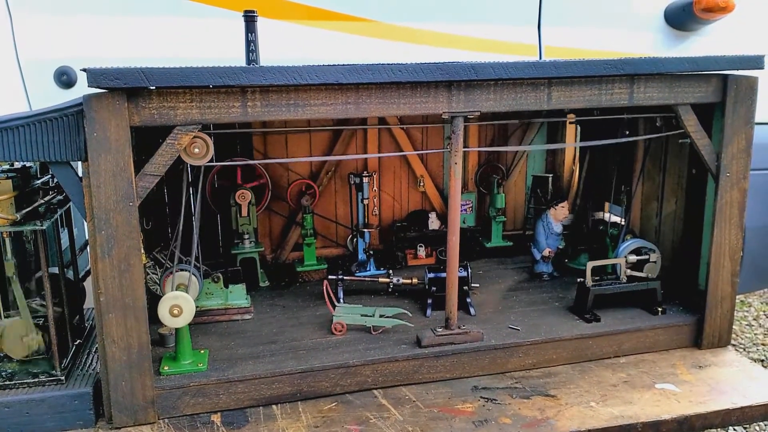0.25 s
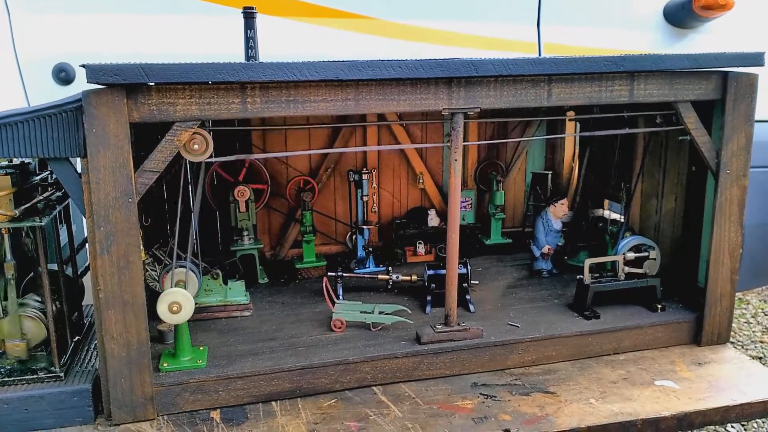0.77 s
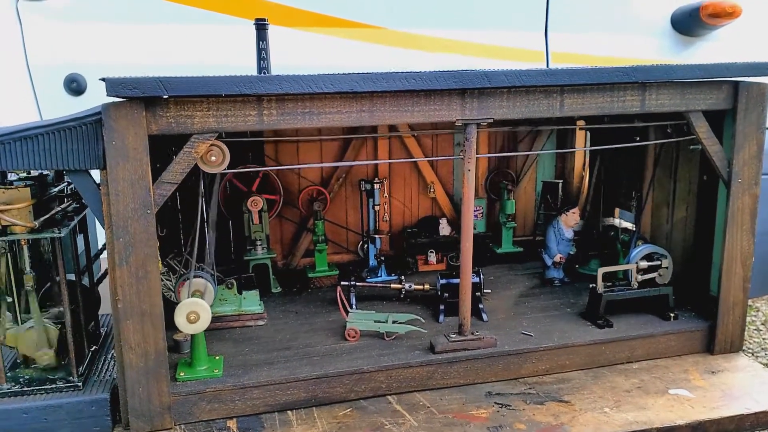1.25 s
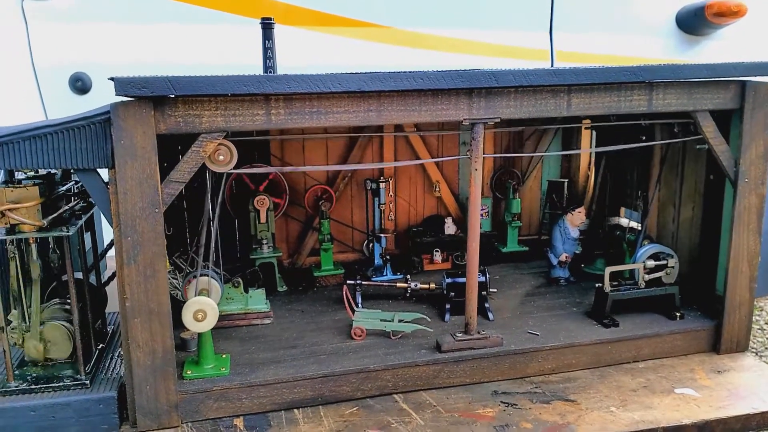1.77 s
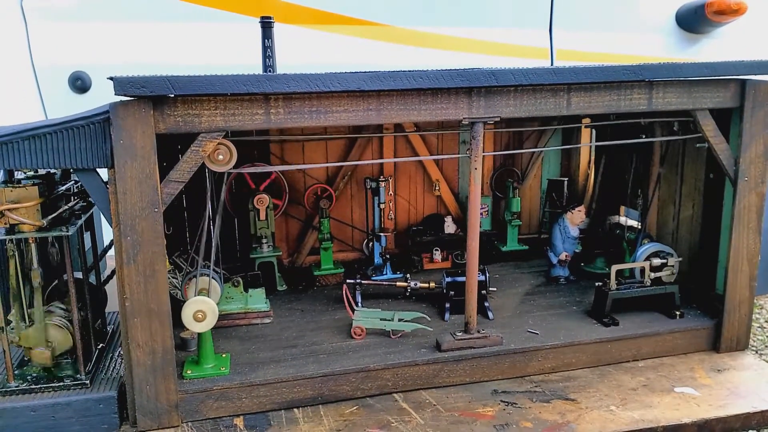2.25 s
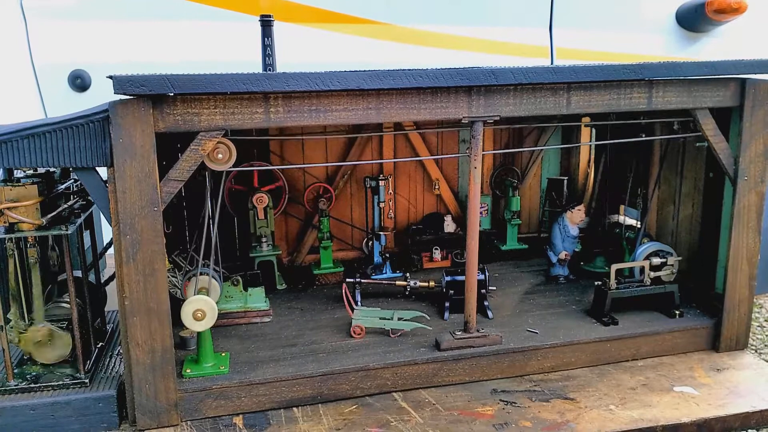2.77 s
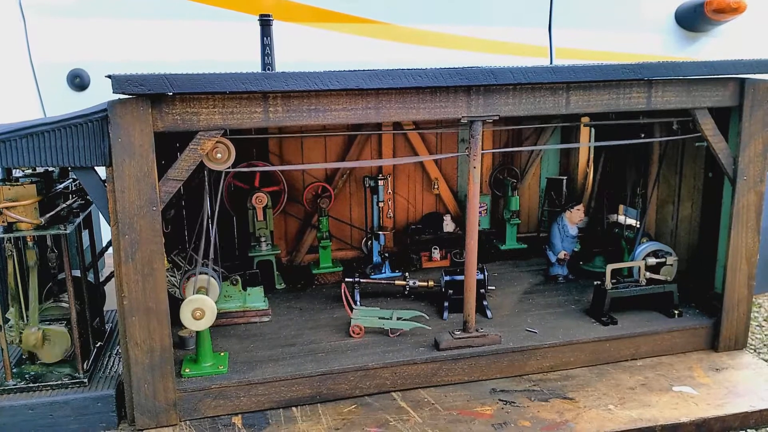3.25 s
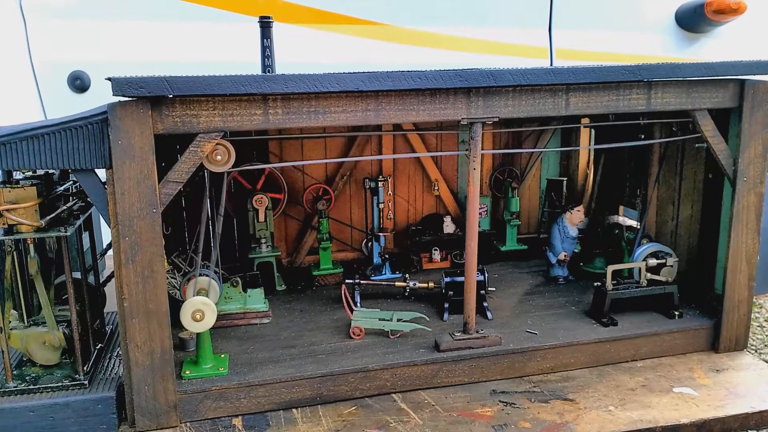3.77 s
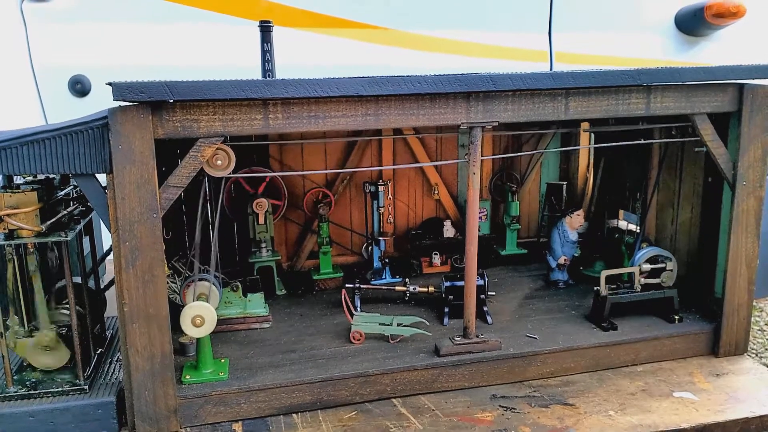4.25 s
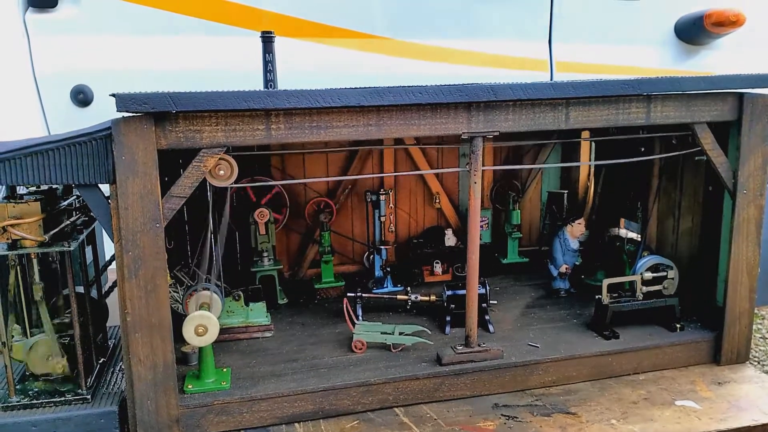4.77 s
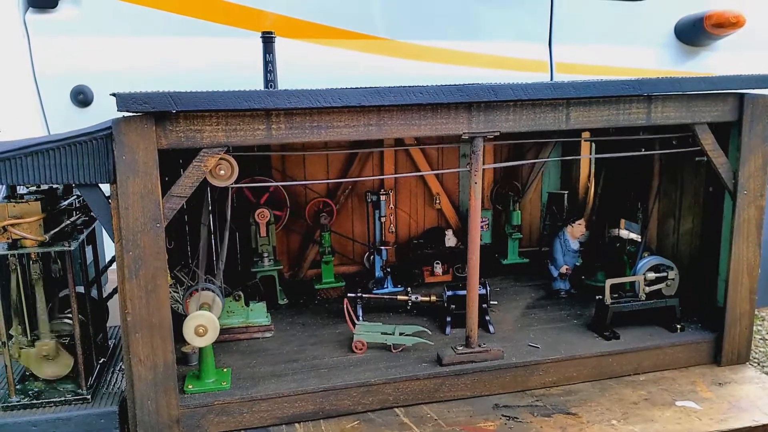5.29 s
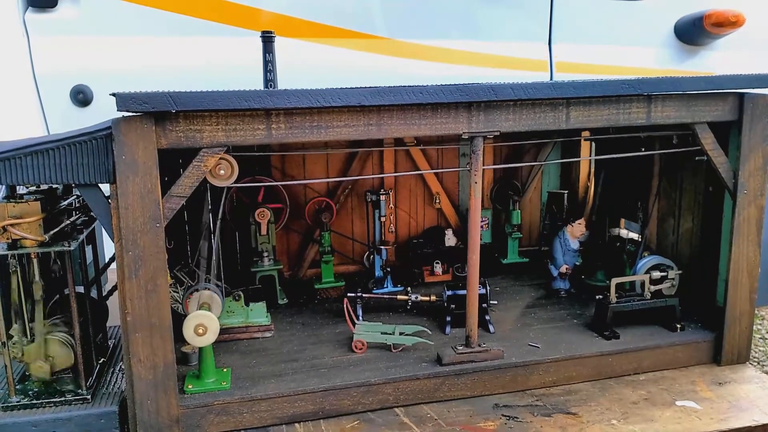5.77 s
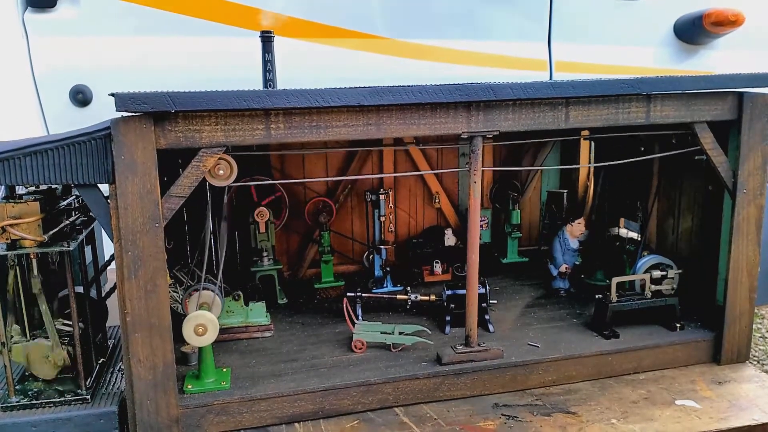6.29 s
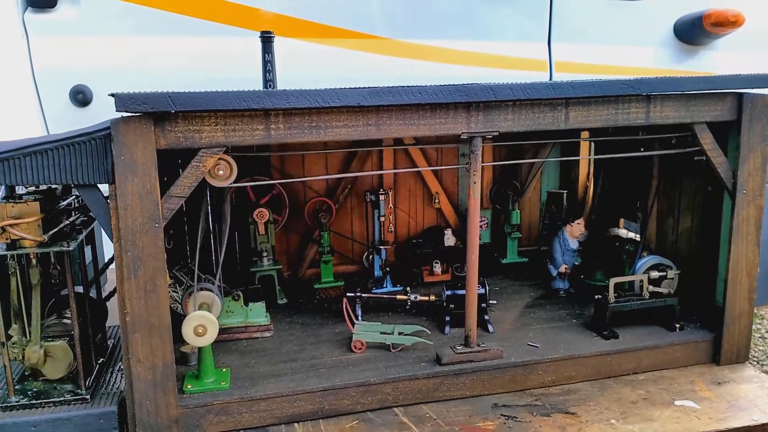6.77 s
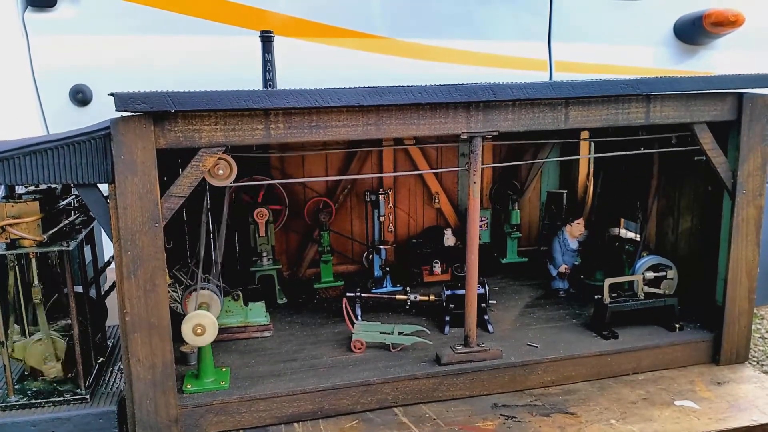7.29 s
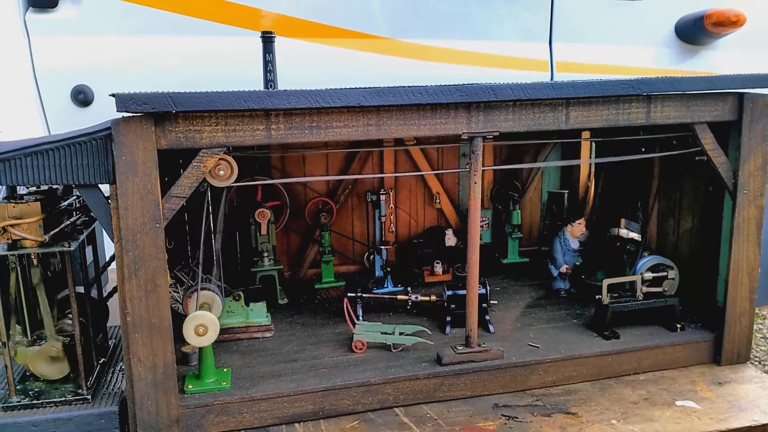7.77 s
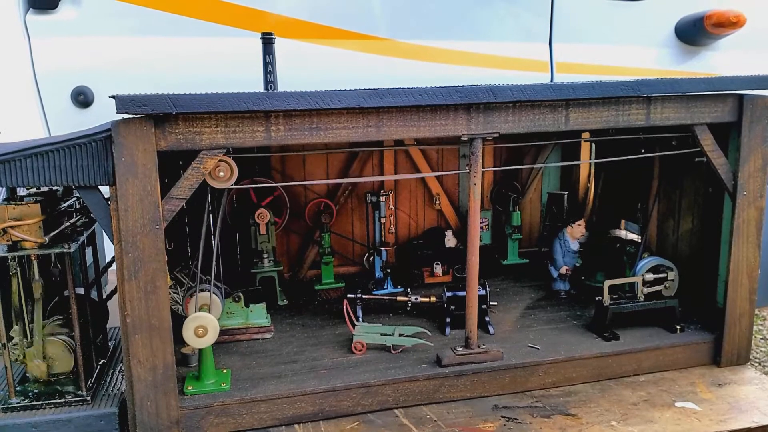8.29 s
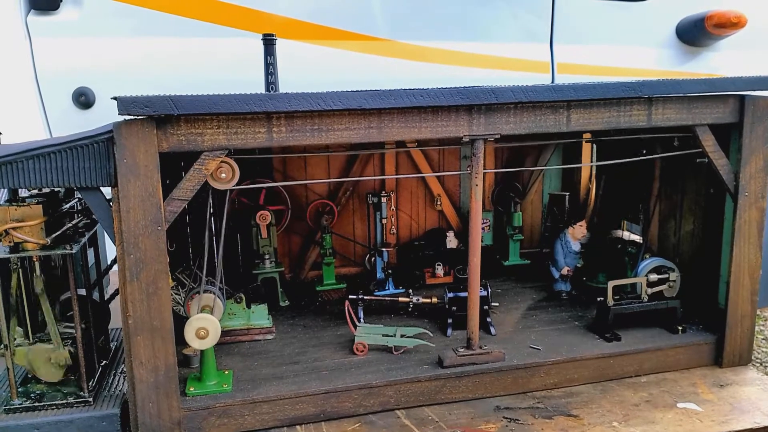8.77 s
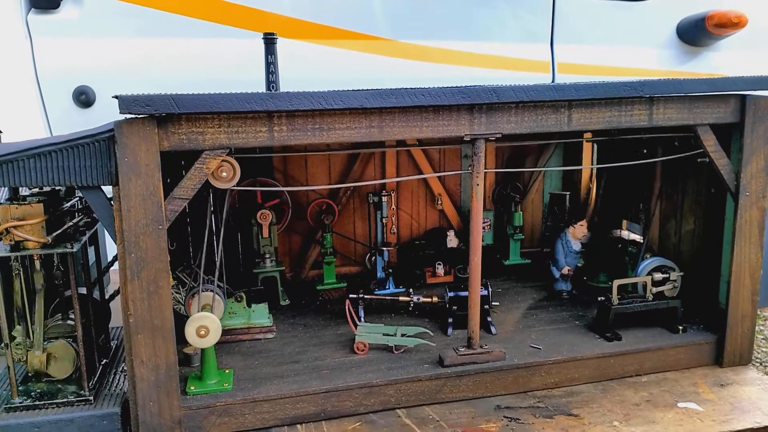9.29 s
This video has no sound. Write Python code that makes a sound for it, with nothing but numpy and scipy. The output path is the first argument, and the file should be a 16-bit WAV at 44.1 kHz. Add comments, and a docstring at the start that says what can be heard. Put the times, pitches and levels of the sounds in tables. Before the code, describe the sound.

Miniature workshop machinery runs nonstop, a slow crank knocking three times a second above rapid linkage chatter, crisp ticks and pattering belts.

```python
"""Small wooden workshop: two model steam engines drive belts and miniature machines.
The slow engine knocks about three times a second as its crank strikes and rebounds; noise puffs on both strokes.
The fast one turns about nine times a second: a catch ticks sharply on some turns, and a repeated run of
blows rattles loose linkage, clacks in the frame and thumps in the baseboard. Around them belts and pulleys
patter, scrape and squeak, a faint high hiss comes in bursts, and the close walls hollow out narrow bands."""
import sys
import numpy as np
from scipy import signal
from scipy.fft import rfft, irfft
from scipy.io import wavfile

SR = 44100
rng = np.random.default_rng(int(sys.argv[2]) if len(sys.argv) > 2 else 0)


def wav_out(sig):
    """Save sig, one row per channel (or a flat mono array), as 16-bit PCM at SR to the path in sys.argv[1]."""
    wavfile.write(sys.argv[1], SR, np.round(np.clip(np.atleast_2d(sig).T, -1, 1) * 32767).astype(np.int16))


N = 420713

# body resonances: f/Hz, half-width/Hz, relative level/dB
BOARD_MODES = [(165.1, 12.7, -1.5), (215.3, 14.4, -3), (252.7, 29, 2), (306, 48.5, -11)]  # wooden baseboard
FRAME_MODES = [(472, 13, -20.5), (661, 36.7, 1), (772.6, 58, -9.5), (1034, 66, -13.5), (1151, 63.4, 5),
               (1343, 28, -7)]  # engine frame
METAL_MODES = [(1672, 39, -7), (2055, 129, 3.5), (2272, 34, 7), (2624, 96, 3), (2808, 57, 6.5),
               (3046, 56, 3.5), (3420, 210, -3), (3583, 48, 2.5), (4066, 130, -1.5), (4525, 71, -4.5),
               (5164, 91, 7.5), (5650, 320, -2), (6147, 53, 1.5), (7055, 49, 12), (7670, 220, 3),
               (8450, 120, 1.5), (9250, 170, -11), (10110, 88, -15), (10320, 160, -14.5),
               (10400, 140, -9.5), (11350, 200, -16)]  # small metal parts
CRANK_MODES = [(627, 39.4, 0), (790, 140, -12.5), (1074, 194, -9.5), (1307, 53, 1.5), (1585, 73, -1),
               (2028, 94, -3), (2084, 243, -7), (3374, 125, -10), (3986, 114, -4), (4523, 63, -2.5),
               (4750, 130, -7), (5390, 210, -2.5), (5566, 133, -3), (6120, 91, -6), (6557, 176, 1),
               (7410, 110, -0.5), (7680, 96, -9.5), (8300, 180, -8.5)]  # knocking crank of the slow engine
EXHAUST_MODES = [(1670, 140, 8), (2160, 280, 15.5)]  # exhaust pipe of the slow engine
# blows within every fast turn, like the teeth of a worn gear:
# delay/s, relative rattle/dB, relative clack/dB, relative thump/dB
TURN_BLOWS = [(-.0025, -4.5, -9, -3.5), (.0035, -6, -6, -14.5), (.0098, -4.5, -8, -8.5),
              (0.019, -4.5, -10.5, -6.5), (0.0323, -3.5, -10.5, -10), (.043, -4, -6, -6),
              (0.0547, -7, -10, -6), (0.066, -28, -7, -5.5), (0.067, -6, -10.5, -10.5),
              (0.086, -11.5, -12.5, -10.5), (0.099, -8, -12, -11.5)]
# how hard the fast engine shakes its parts: t/s, rattle/dB, clack/dB
FAST_SHAKE = [(0, -52.5, -52.5), (1, -54.5, -55.5), (2.2, -54, -55.5), (3.7, -55.5, -55.5),
              (4.3, -55, -54.5), (5.4, -56.5, -56), (6.2, -55.5, -55.5), (6.7, -57.5, -59),
              (7.1, -59.5, -56), (7.6, -57, -57.5), (7.95, -57, -55), (8.3, -60.5, -56.5),
              (9.1, -56, -55.5), (9.5, -59, -60.5)]
# slow-engine strokes: t/s, knock/dB, brightness/(dB/octave), relative puff/dB, relative return puff/dB
SLOW_STROKES = [(0.0021, -33.5, 0.8, -59.5, -65), (0.315, -36.5, 1.5, -60, -59),
                (0.627, -33, 3, -56, -65.5), (0.947, -33, 2, -56.5, -58), (1.2805, -31.5, 1.5, -57.5, -59),
                (1.592, -35.5, 1.5, -58.5, -60), (1.9099, -31.5, 2.5, -61, -66.5),
                (2.2204, -34.5, 2.5, -57.5, -65.5), (2.5402, -32, 3, -69.5, -67.5),
                (2.8677, -31.5, 3.5, -57.5, -67.5), (3.1973, -33, 1.5, -62, -69),
                (3.5159, -30.5, 4.5, -61, -65), (3.8295, -33.5, 3.2, -57.5, -56.5),
                (4.1446, -34.5, 2, -56, -59), (4.4624, -32, 3.3, -58.5, -62.5),
                (4.7988, -31.5, 4, -57.5, -65), (5.1202, -36.5, 2.5, -61.5, -75),
                (5.445, -32.5, 4.5, -59.5, -70.5), (5.7567, -35.5, 2, -61, -71),
                (6.0734, -31.5, 2.8, -61, -60), (6.401, -33.5, 4.5, -57, -63),
                (6.7257, -36.5, 3.5, -59, -69), (7.0468, -34.5, 2.3, -61.5, -82),
                (7.366, -31.5, 4.5, -57.5, -59), (7.676, -29.5, 4, -54.5, -75),
                (8.0033, -40, 2.5, -56.5, -58), (8.3318, -33.5, 4, -60, -66.5),
                (8.651, -33.5, 2, -57.5, -76), (8.9595, -32, 3, -67, -69), (9.276, -31.5, 3.5, -60, -65.5)]


def amp(db):
    """Amplitude ratio of a level in dB."""
    return 10 ** (np.asarray(db) / 20)


def evened(x):
    """x scaled to rms 1."""
    return x / np.sqrt(np.mean(x ** 2) + 1e-20)


def sized(x, db, seconds):
    """x scaled to the energy of a sound at rms level db lasting so many seconds."""
    return x * amp(db) * np.sqrt(seconds * SR / (np.sum(x ** 2) + 1e-20))


def add(mix, s, sound):
    """Add sound into mix at time s, cropped at both ends."""
    start = round(s * SR)
    sound = sound[max(-start, 0):]
    part = mix[max(start, 0):][:len(sound)]
    part += sound[:len(part)]


def read(curve, s):
    """Every column of a curve, interpolated at the times s."""
    at, *columns = np.transpose(curve)
    return np.array([np.interp(s, at, column) for column in columns])


def wander(cutoff_hz):
    """Random drift: noise below cutoff_hz, rms 1."""
    hz = np.fft.rfftfreq(N, 1 / SR)
    return evened(irfft(rfft(rng.standard_normal(N)) * (hz < cutoff_hz), N))


def ring(modes, size=8192, lag_s=0.00296):
    """Click response, energy 1, of a body with steep-sided resonances and dispersive bending waves."""
    signed_hz = np.fft.fftfreq(size, 1 / SR)
    hz = abs(signed_hz)
    power = sum(amp(db) ** 2 / (1 + ((hz - f) / width) ** 2) ** 2 for f, width, db in modes)
    log_gain = np.log(power + 1e-10) / 2
    minimum_phase = np.conj(signal.hilbert(log_gain))
    # treble arrives first: delay = lag_s * (sqrt(1000 / f) - sqrt(1000 / Nyquist)), here integrated over f
    travel = np.sign(signed_hz) * np.sqrt(1000) * (2 * np.sqrt(hz) - hz / np.sqrt(SR / 2))
    spectrum = np.exp(minimum_phase - 2j * np.pi * lag_s * travel)
    response = np.fft.ifft(spectrum).real[:size // 2]
    return response / np.linalg.norm(response)


def spots(modes, spread_db, count=16):
    """Responses of one body struck at different spots: each favours other resonances."""
    favour = rng.standard_normal((count, len(modes)))
    return [ring([(f, width, db + spread_db * v) for (f, width, db), v in zip(modes, row)])
            for row in favour]


def shaken(force, modes, spread_db, size=512, count=8):
    """A running force whose point of contact jumps over the body every size samples."""
    where = rng.integers(0, count, N // size + 1).repeat(size)[:N]
    bodies = spots(modes, spread_db, count=count)
    return sum(signal.oaconvolve(force * (where == k), body)[:N] for k, body in enumerate(bodies))


def chatter(t, decay_s, per_s):
    """A first contact followed by a dying random shower of others, energy 1."""
    contacts = rng.standard_normal(len(t)) * (rng.random(len(t)) < per_s / SR)
    contacts[0] = rng.choice([-1, 1])
    burst = contacts * np.exp(-t / decay_s)
    return burst / np.linalg.norm(burst)


def fast_turns():
    """Times at which the fast crank passes dead centre, from its integrated speed."""
    # speed of the fast engine: t/s, speed/(turns/s)
    speed = [(0.0, 8.908), (1.03, 8.7357), (1.25, 8.9845), (2.36, 8.7309), (3.72, 8.7953), (4.41, 8.9247),
             (4.63, 8.5268), (4.83, 8.8423), (5.57, 8.5448), (5.96, 8.9892), (6.47, 8.6574), (6.67, 8.8174),
             (8.03, 8.7112), (8.41, 8.9451), (8.98, 8.9524), (9.5, 8.6414)]
    first_s = .0532
    t = np.arange(round(first_s * SR), N) / SR
    turns = np.cumsum(read(speed, t)[0]) / SR
    return np.interp(np.arange(int(turns[-1]) + 1), turns, t)


def surge(depth_db=4.0, peak_turn=0.34, follow=0.35):
    """Belt pull, rms 1: peaks a third into each fast turn and slackens when the engine runs easily."""
    t, times = np.arange(N) / SR, fast_turns()
    turns = np.interp(t, times, np.arange(len(times)))
    effort_db = read(FAST_SHAKE, t).mean(0)
    return evened(amp(depth_db * np.cos(2 * np.pi * (turns - peak_turn)) + follow * effort_db))


def air():
    """Faint steady outdoor noise: shaped Gaussian noise."""
    # noise colour: f/Hz, relative density/dB
    colour = [(30, -36), (75, 5), (110, -7), (150, 12.5), (430, -3), (1000, -59), (3000, -2.5), (8000, -49),
              (12000, -29), (16000, -38)]
    hz, (f, db) = np.fft.rfftfreq(N, 1 / SR), np.transpose(colour)
    gain = amp(np.interp(np.log(hz + 1), np.log(f), db))
    return amp(-69.5) * evened(irfft(rfft(rng.standard_normal(N)) * gain, N))


def high_hiss(decay_s=0.031):
    """Faint high hiss: a decaying burst of noise at every fast turn."""
    # hiss colour: f/Hz, half-width/Hz, relative level/dB
    hiss_modes = [(10860, 159, 5.5), (13105, 240, 3), (13600, 530, -3)]
    # hiss level: t/s, level/dB
    level = [(1.5, -78.5), (2.1, -68), (2.9, -79), (5.3, -69.5), (6.6, -71), (7.3, -79), (8.1, -75),
             (8.5, -100)]
    envelope, t = np.zeros(N), np.arange(SR // 8) / SR
    for s in fast_turns():
        add(envelope, s, np.exp(-t / decay_s))
    bursts = envelope * rng.standard_normal(N) * amp(4.5 * wander(200))
    hiss = evened(shaken(bursts, hiss_modes, spread_db=4))
    return amp(read(level, np.arange(N) / SR)[0]) * hiss


def shafting(modes, db, per_s, swell_db, spread_db=6):
    """Belts, pulleys and little machines: sparse random contacts patter unevenly in one body."""
    contacts = rng.standard_normal(N) * (rng.random(N) < per_s / SR) * amp(swell_db * wander(35))
    return amp(db) * evened(shaken(contacts, modes, spread_db))


def bearing_song():
    """Running bearings sing faintly: dense random contacts excite narrow resonances."""
    # bearing resonances: f/Hz, half-width/Hz, relative level/dB
    bearing_modes = [(3622, 28, 6), (3867, 55, -8.5), (5304, 40, -4), (7200, 47, -10)]
    return shafting(bearing_modes, db=-69.5, per_s=8000, swell_db=1.0, spread_db=6.5)


def clatter(db=-62, per_s=32, scatter_db=3.5, decay_s=0.0061, spread_db=7):
    """Little hammers and levers land at random, each a short clump of contacts with its own tone."""
    out, t, bodies = np.zeros(N), np.arange(SR // 20) / SR, spots(METAL_MODES, spread_db, count=32)
    for s in np.flatnonzero(rng.random(N) < per_s * surge() / SR) / SR:
        hit = signal.fftconvolve(chatter(t, decay_s, per_s=1200), bodies[rng.integers(len(bodies))])
        add(out, s, amp(scatter_db * np.clip(rng.standard_normal(), -2, 2)) * hit)
    return amp(db) * evened(out)


def squeaks(waver_hz=35):
    """Dry bearings squeak or a pulley groans: short sines of wavering pitch."""
    # t/s, length/s, f/Hz, level/dB (rms at the crest)
    tones = [(1.63, 0.091, 866, -57), (2.87, 0.065, 867, -57), (2.974, 0.11, 950, -57),
             (3.602, 0.068, 7200, -48.5)]
    out, waver = np.zeros(N), wander(150)
    for s, length_s, hz, db in tones:
        pitch_hz = hz + waver_hz * waver[round(s * SR):][:round(length_s * SR)]
        tone = np.sqrt(2) * np.sin(2 * np.pi * np.cumsum(pitch_hz) / SR)
        add(out, s, amp(db) * signal.windows.hann(len(tone)) * tone)
    return out


def scrapes():
    """A slipping belt rasps on its pulley: short swells of noise through the pulley's resonances."""
    # t/s, length/s, level/dB (at the crest)
    slips = [(0.397, 0.081, -54), (0.5, 0.036, -48.5), (3.128, 0.07, -51.5), (3.332, 0.038, -56),
             (3.545, 0.2, -57), (5.136, 0.084, -49), (6.669, 0.048, -47.5), (8.462, 0.041, -56),
             (9.15, .05, -54)]
    # pulley resonances: f/Hz, half-width/Hz, relative level/dB
    pulley_modes = [(5570, 230, 8), (6700, 450, 3), (7250, 450, 3)]
    grip = np.zeros(N)
    for s, length_s, db in slips:
        add(grip, s, amp(db) * signal.windows.hann(round(length_s * SR)))
    friction = rng.standard_normal(N) * amp(4 * wander(120))
    return grip * evened(shaken(friction, pulley_modes, spread_db=4))


def bumps(width_hz=35):
    """Single dull blows on the baseboard, one resonance each; pitch depends on where they land."""
    # t/s, level/dB, f/Hz
    blows = [(0.905, -49, 171.5), (1.512, -45.5, 224), (1.584, -44.5, 174), (1.913, -44, 176),
             (3.624, -46, 170), (4.881, -46.5, 225), (7.049, -46.5, 247)]
    out = np.zeros(N)
    for s, db, hz in blows:
        add(out, s, sized(ring([(hz, width_hz, 0)]), db, seconds=0.0095))
    return out


def clacks(decay_s=0.0049):
    """Some return strokes of the slow engine clack: a few contacts shake metal, frame and exhaust pipe."""
    # t/s, level/dB
    hits = [(.526, -47.5), (1.183, -48), (2.778, -53), (3.579, -46), (4.361, -51.5), (5.328, -50),
            (8.855, -49.5)]
    out, t = np.zeros(N), np.arange(SR // 20) / SR
    body = ring(METAL_MODES) + ring(FRAME_MODES) + ring(EXHAUST_MODES)
    for s, db in hits:
        hit = signal.fftconvolve(chatter(t, decay_s, per_s=440), body)
        add(out, s, sized(hit, db, seconds=0.012))
    return out


def clanks(decay_s=0.013, crank_db=-1):
    """Some slow return strokes clank a loose rod: it rattles, rings and shakes the crank with it."""
    # t/s, level/dB
    hits = [(0.852, -50), (2.443, -47), (4.046, -49), (5.983, -49), (7.579, -44.5), (9.499, -52.5)]
    # rod resonances: f/Hz, half-width/Hz, relative level/dB
    rod_modes = [(486, 79.4, -5), (1170, 220, -4.5), (2230, 109, -0.5), (4006, 200, 3.5)]
    out, t, crank = np.zeros(N), np.arange(SR // 25) / SR, ring(CRANK_MODES)
    for (s, db), rod in zip(hits, spots(rod_modes, spread_db=2.5, count=len(hits))):
        body = rod + amp(crank_db) * crank
        hit = signal.fftconvolve(chatter(t, decay_s, per_s=1600), body)
        add(out, s, sized(hit, db, seconds=0.026))
    return out


def puffs(rise_s=0.0018, decay_s=0.035, back_s=0.219, back_rise_s=0.011, grain_db=0.2):
    """Steam noise puffs with each knock, and again with a slower onset on the return stroke."""
    flow, t = np.zeros(N), np.arange(SR // 3) / SR
    for s, _, _, db, back_db in SLOW_STROKES:
        add(flow, s, amp(db) * (1 - np.exp(-t / rise_s)) * np.exp(-t / decay_s))
        add(flow, s + back_s, amp(back_db) * (1 - np.exp(-t / back_rise_s)) * np.exp(-t / decay_s))
    steam = flow * evened(rng.standard_normal(N) * amp(grain_db * wander(340)))
    in_metal = shaken(steam, METAL_MODES, spread_db=4.0)
    in_crank = shaken(steam, CRANK_MODES, spread_db=2.5)
    in_pipe = shaken(steam, EXHAUST_MODES, spread_db=29.0)
    return in_metal + amp(8.5) * in_crank + amp(6.0) * in_pipe


def linkage(modes, turn_db, blow_db, decay_s, per_s, jitter_s, scatter_db, spread_db):
    """Every turn repeats one run of blows, each a little early or late and on another spot."""
    lead_s = .01  # room for blows ahead of dead centre
    out, bodies, t = np.zeros(N), spots(modes, spread_db), np.arange(SR // 25) / SR
    delays_s = np.transpose(TURN_BLOWS)[0]
    for s, level_db in zip(fast_turns(), turn_db):
        turn = np.zeros(SR // 4)
        chance = rng.standard_normal((len(TURN_BLOWS), 2))
        for delay_s, db, (late, hard) in zip(delays_s, blow_db, chance):
            body = bodies[rng.integers(len(bodies))]
            blow = signal.fftconvolve(chatter(t, decay_s, per_s), body)
            add(turn, lead_s + delay_s + jitter_s * late, amp(db + scatter_db * hard) * blow)
        add(out, s - lead_s, sized(turn, level_db, seconds=0.1))
    return out


def fast_engine(thump_db=-61):
    """Loose linkage shakes metal, frame and baseboard; the level varies from turn to turn."""
    # turn-to-turn standard deviation: rattle/dB, clack/dB, thump/dB
    scatter = (2.1, 1.5, 3)
    times = fast_turns()
    rattle_chance, clack_chance, thump_chance = (rng.standard_normal((len(times), 3)) * scatter).T
    rattle_db, clack_db = read(FAST_SHAKE, times)
    board_db = thump_db + rattle_db - rattle_db.mean()  # thumps follow the rattle
    _, on_metal, on_frame, on_board = np.transpose(TURN_BLOWS)
    rattle = linkage(METAL_MODES, rattle_db + rattle_chance, on_metal, decay_s=0.0048, per_s=5000,
                     jitter_s=.0006, scatter_db=1.0, spread_db=4.0)
    clack = linkage(FRAME_MODES, clack_db + clack_chance, on_frame, decay_s=0.0063, per_s=3000,
                    jitter_s=0.001507, scatter_db=1.5, spread_db=5.5)
    thump = linkage(BOARD_MODES, board_db + thump_chance, on_board, decay_s=0.0037, per_s=600,
                    jitter_s=0.0014, scatter_db=2.5, spread_db=4.0)
    return rattle + clack + thump


def ticks(shake_db=-16, decay_s=0.00026, buzz_db=-7, buzz_decay_s=0.018,
          graze_db=-48, back_s=0.0448, back_db=-54, back_decay_s=0.0035):
    """A light catch grazes every turn and its spring clicks back; engaging, it snaps and buzzes."""
    # turns on which the catch snaps fully home: t/s, level/dB
    snaps = [(0.0525, -30), (0.1668, -34), (0.2783, -31.5), (0.39, -31.5), (0.9596, -33), (1.073, -34),
             (1.2989, -31.5), (1.4084, -37), (1.5216, -33), (1.635, -32.5), (1.747, -36.5), (1.9734, -35),
             (2.0859, -32), (2.1996, -40), (2.5452, -34), (2.659, -38), (2.8856, -29.5), (3.1135, -34),
             (3.345, -37), (3.4569, -34), (3.5693, -36), (3.6847, -33), (4.0245, -35), (4.137, -30),
             (4.25, -38), (4.3613, -39), (4.475, -36), (4.7086, -34.5), (4.8212, -30.5), (4.9328, -33.5),
             (5.2784, -36), (5.3938, -36), (5.5086, -33), (5.7417, -33.5), (5.8553, -35.5), (5.966, -36),
             (6.1917, -39.5), (6.4196, -34), (6.5352, -34), (6.9885, -34.5), (7.1024, -33.5),
             (7.2172, -34.5), (7.3338, -38), (7.445, -37.5), (7.559, -37), (7.673, -32), (7.9034, -31.5),
             (8.1314, -40), (8.2448, -32.5)]
    # catch, then its spring: f/Hz, half-width/Hz, relative level/dB
    catch_modes = [(7220, 540, 1.5), (8080, 390, 7.5), (8660, 150, 3.5), (9970, 49, -5), (9160, 29, -9)]
    spring_modes = [(6600, 340, -9), (10084, 140, 6.5), (11420, 160, -1)]
    out, t = np.zeros(N), np.arange(SR // 30) / SR
    metal, spring = ring(METAL_MODES), ring(spring_modes)
    for (s, db), catch in zip(snaps, spots(catch_modes, spread_db=7.0, count=len(snaps))):
        body = catch + amp(shake_db) * metal
        snap = signal.fftconvolve(chatter(t, decay_s, per_s=8500), body)
        buzz = signal.fftconvolve(chatter(t, buzz_decay_s, per_s=2400), body)
        add(out, s, sized(snap, db, seconds=0.00072))
        add(out, s, sized(buzz, db + buzz_db, seconds=0.0015))
    catch = ring(catch_modes)
    for s in fast_turns():
        for delay_s, body, db in ((0, catch, graze_db), (back_s, spring, back_db)):
            click = signal.fftconvolve(chatter(t, back_decay_s, per_s=3500), body)
            add(out, s + delay_s, sized(click, db, seconds=0.0011))
    return out


def knocks(scatter=.07, scatter_db=0.8, colour_db=2.0, grit_db=-9, grit_decay_s=0.0041,
           echo_db=-11, echo_decay_s=0.057, loose_db=-7, loose_decay_s=0.093,
           onset_db=-14, onset_s=0.0022):
    """Slow crank strikes, rebounds; loose parts jingle and the walls scatter it back."""
    # contact and rebounds: delay/s, relative level/dB, cut-off/Hz
    rebounds = [(0, 0, 15000), (.0012, -4, 11100), (.002, -1.5, 4430), (.0038, 3, 2700),
                (.0075, -5.5, 3000)]
    out, t = np.zeros(N), np.arange(SR // 11) / SR
    for s, db, bright_db, _, _ in SLOW_STROKES:
        favour = colour_db * rng.standard_normal(len(CRANK_MODES))
        modes = [(f, width, level + v + bright_db * np.log2(f / 3000))
                 for (f, width, level), v in zip(CRANK_MODES, favour)]
        body = ring(modes, lag_s=0.000989)
        grit = amp(grit_db) * chatter(t, grit_decay_s, per_s=5900)
        echo = amp(echo_db) * chatter(t, echo_decay_s, per_s=1700)
        jingle = amp(loose_db) * chatter(t, loose_decay_s, per_s=130)
        force = grit + echo + jingle
        chance = rng.standard_normal((len(rebounds), 2))
        for (delay_s, rebound_db, hz), (late, hard) in zip(rebounds, chance):
            push = t * np.exp(-2 * np.pi * hz * t)
            strength = amp(rebound_db + scatter_db * hard)
            add(force, delay_s * (1 + scatter * late), strength * push / push.sum())
        # a very short noise swell that softens the onset
        onset = amp(onset_db) * chatter(t, onset_s, per_s=SR)[::-1]
        knock = signal.fftconvolve(np.r_[onset, force], body)
        add(out, s - t[-1], sized(knock, db, seconds=0.0038))
    return out


def workshop(x):
    """Reflections from the close wooden walls cancel narrow bands of everything inside."""
    # cancelled bands: f/Hz, half-width/Hz (at 1/e of the dip), level/dB
    hollows = [(1765, 44, -9.5), (2330, 25, 0), (3120, 58, -11), (3713, 76, -1), (4260, 73, -13),
               (4560, 50, -9.5), (5930, 100, -6), (6230, 92, -3), (7070, 150, -2), (7500, 98, -12),
               (9100, 63, -14)]
    hz = np.fft.rfftfreq(N, 1 / SR)
    dip_db = sum(db * np.exp(-((hz - f) / width) ** 2) for f, width, db in hollows)
    return irfft(rfft(x) * amp(dip_db), N)


def scene():
    """Both engines and the machines they drive inside the walls, plus outdoor air."""
    patter = (shafting(METAL_MODES, db=-67.5, per_s=9000, swell_db=4.5, spread_db=0.0)
              + shafting(FRAME_MODES, db=-64.5, per_s=900, swell_db=1.5)
              + shafting(BOARD_MODES, db=-66.0, per_s=180, swell_db=5.5))
    driven = surge() * (patter + bearing_song()) + clatter() + squeaks() + scrapes() + bumps()
    slow = clacks() + clanks() + puffs() + knocks()
    fast = fast_engine() + ticks()
    return (workshop(high_hiss() + driven + slow + fast) + air())[None]


def record(dry):
    """The recorder's band limit: linear-phase low-pass at 15.85 kHz."""
    low_pass = signal.firwin(511, 15850, window=("kaiser", 9), fs=SR)
    return signal.oaconvolve(dry, low_pass[None], "same")


dry = scene()
out = record(dry)
wav_out(out)
```